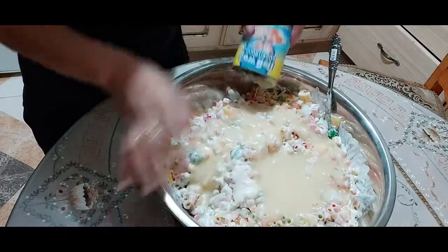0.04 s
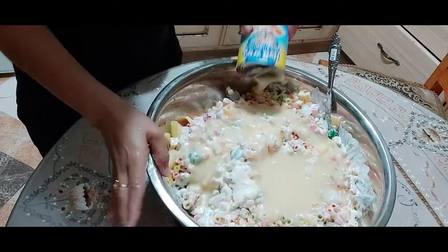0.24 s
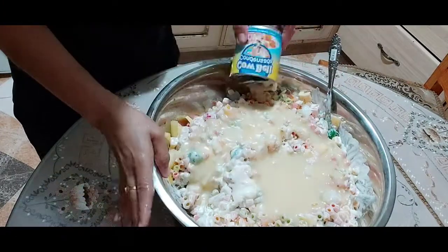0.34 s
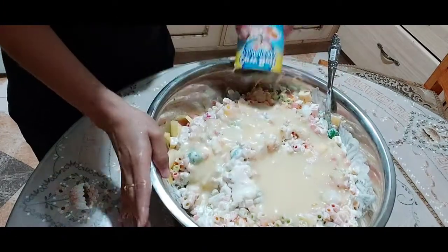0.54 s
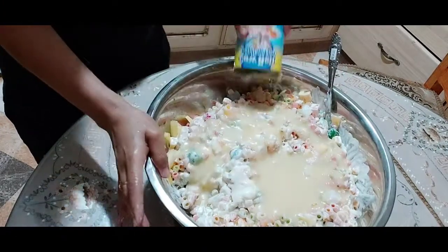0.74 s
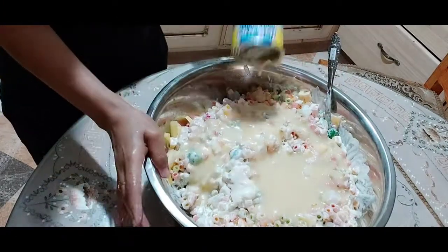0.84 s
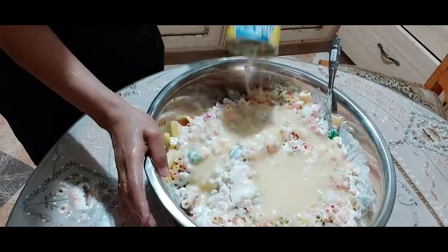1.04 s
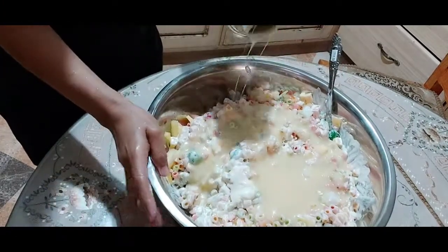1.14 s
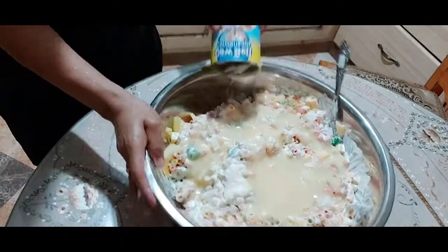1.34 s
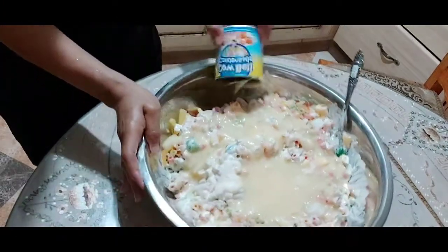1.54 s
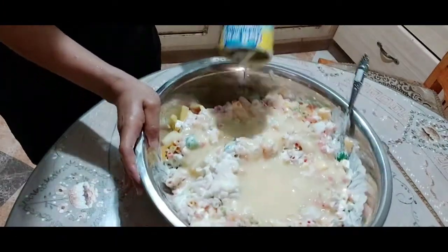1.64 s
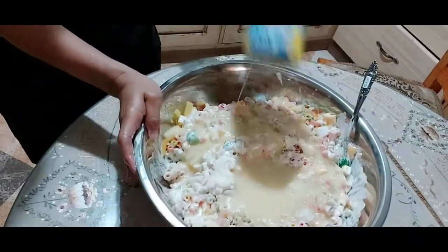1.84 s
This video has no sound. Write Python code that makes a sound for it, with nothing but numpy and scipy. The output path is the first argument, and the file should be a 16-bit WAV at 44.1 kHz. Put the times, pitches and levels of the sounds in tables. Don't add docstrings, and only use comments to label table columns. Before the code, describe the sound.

Sharp short can knocks on a food-filled steel bowl, soft at first and then firmer, a brief scrape and two loud blows; bright kitchen echoes, low household murk and faint hiss, close phone microphones.

```python
import sys
import numpy as np
from scipy import signal
from scipy.fft import rfft, irfft
from scipy.io import wavfile
from scipy.ndimage import map_coordinates

SR = 44100
rng = np.random.default_rng(int(sys.argv[2]) if len(sys.argv) > 2 else 0)


def gain_from_db(level_db):
    decades = np.asarray(level_db, float) / 20
    return 10 ** decades


def int16_out(signal):
    q = np.round(np.clip(np.atleast_2d(signal).T, -1, 1) * 32767)
    wavfile.write(sys.argv[1], SR, q.astype(np.int16))


N = 83790


def fade(t, t60):
    return np.exp(-np.log(1000) * t / t60)


def pan(db):
    return gain_from_db([[db / 2], [-db / 2]])


def colour(x, points):
    hz = np.fft.rfftfreq(x.shape[-1], 1 / SR) + 1
    point_hz, point_db = np.transpose(points)
    gain = gain_from_db(np.interp(np.log(hz), np.log(point_hz), point_db))
    y = irfft(rfft(x) * gain, x.shape[-1])
    return y / np.sqrt(np.mean(y ** 2))


def blend(mid, side, alike):
    alike = np.clip(alike, 0, 1)
    return np.sqrt((1 + alike) / 2) * mid + np.sqrt((1 - alike) / 2) * side * np.array([[1], [-1]])


def pair(size, alike):
    mid, side = rng.standard_normal((2, size))
    return blend(mid, side, alike)


# (frequency [Hz], level [dB per Hz])
HUM_COLOUR = [(35, -66), (75, -9), (105, -19.5), (135, -2.5), (205, -18.5), (360, -8), (800, -12),
              (16000, -50.5)]
# (time [s], level [dB])
HUM_LEVEL = [
    (0, -45),
    (.1, -49.5),
    (.6, -57),
    (1.6, -49.5),
    (1.9, -56.5),
]


def hum():
    low_pass = signal.butter(1, 900, fs=SR, output="sos")
    high_pass = signal.butter(1, 900, "high", fs=SR, output="sos")
    low = signal.sosfilt(low_pass, pair(N, .93))
    high = signal.sosfilt(high_pass, pair(N, 0.052))
    time, level_db = np.transpose(HUM_LEVEL)
    swell = gain_from_db(np.interp(np.arange(N) / SR, time, level_db))
    return colour(low + high, HUM_COLOUR) * swell * pan(2.5)


# (frequency [Hz], level [dB])
HISS_COLOUR = [(1500, 2), (3000, -5.5), (6000, -9), (8000, -4), (10500, -1), (14500, -5.5), (16500, -7.5)]


def hiss():
    return gain_from_db(-63) * colour(pair(N, 0), HISS_COLOUR)


# (time [s], level [dB])
TICK_TIMES = [
    (.06, -55),
    (1.718, -55),
    (1.787, -56),
]


def ticks():
    tick_hz, t60_s = 2500, .012
    points = [(tick_hz / 4, -10), (tick_hz, 0), (tick_hz * 2, -20)]
    out, t = np.zeros((2, N + SR)), np.arange(SR // 10) / SR
    for s, db in TICK_TIMES:
        i = int(s * SR)
        out[:, i:i + len(t)] += gain_from_db(db) * colour(pair(len(t), 1.0), points) * fade(t, t60_s)
    return out[:, :N]


# (frequency [Hz], t60 [s], level [dB], likeness of the two ports [0-1])
ROOM = [(48.7, 0.49, -9.5, 1), (139, 0.89, -16, 0.96), (378, 0.49, -9, 0.78), (756, 0.4, -18.5, 0.29),
        (1390, 0.43, -16, 0), (3240, 0.48, -7.5, 0.14), (6500, 0.36, -4, 0), (12340, .33, -5, 0.07)]


def echoes():
    gap_s, rise_s = 0.0013, 0.002
    t, room = np.arange(SR) / SR, np.array(ROOM)
    octaves = np.log2(np.fft.rfftfreq(SR, 1 / SR) + 1)
    noise, echo = rfft(pair(SR, 0)), 0
    for octave in np.arange(5, 14.6, .5):
        t60, db, alike = (np.interp(octave, np.log2(room[:, 0]), room[:, k]) for k in (1, 2, 3))
        window = np.cos(np.pi * np.clip(octaves - octave, -.5, .5))
        mid, side = irfft(noise * window, SR)
        even_energy = np.sqrt(2 * np.log(1000) / t60 / SR)
        echo = echo + blend(mid, side, alike) * fade(t, t60) * gain_from_db(db) * even_energy
    return echo * (1 - np.exp(-np.maximum(t - gap_s, 0) / rise_s)) * gain_from_db(10)


def kitchen(x, patterns):
    shared = .6
    turn = 2 * np.pi * rng.random()
    own = np.cos(turn) * patterns[1] + np.sin(turn) * patterns[2]
    echo = np.sqrt(shared) * patterns[0] + np.sqrt(1 - shared) * own
    return signal.fftconvolve(x[None, :SR // 3], echo, axes=1)[:, :SR]


def ring(t, modes):
    out = np.zeros((2, len(t)))
    for k, (hz, db, t60, pan_db) in enumerate(modes):
        hz_chance, db_chance = rng.standard_normal(2)
        hz = hz * (1 + .005 * hz_chance)
        gain = gain_from_db(db + 1.2 * db_chance) * pan(pan_db)
        out += (-1) ** k * gain * np.sin(2 * np.pi * hz * t) * fade(t, t60)
    return out


# (frequency [Hz], level [dB], t60 [s], left minus right [dB])
TABLE_MODES = [(53.3, -13, 0.3, -10), (84, 0.5, 0.034, -21), (146, -4, 0.11, -0.5), (163, -8, 0.18, 6.5),
               (211.7, 7, 0.074, 2.5), (248, 3, 0.11, 4), (317, 7, 0.013, -2), (426, -5, 0.089, 15)]


def table_thud(t):
    return ring(t, TABLE_MODES) * (1 - np.exp(-t / .004))


# (frequency [Hz], level [dB], t60 [s], left minus right [dB])
CAN_MODES = [(393, -9, 0.051, 2), (587.6, -13.5, 0.13, -2), (668, 10, 0.031, 1), (807.5, 2.5, 0.038, -2.5),
             (944, 1.5, 0.056, 1), (1076, -14, 0.12, -9.5), (1288, 4, 0.024, 0), (1652, -6, 0.018, 8),
             (1796, -23.5, 0.035, -34), (2116, -2.5, 0.0078, -19.5), (2364, -20.5, 0.012, 29),
             (715, -3.5, 0.058, 6)]
# (frequency [Hz], level [dB], t60 [s], left minus right [dB])
RIM_MODES = [(4450, -2, .014, -2), (4640, 0, .016, -2), (4850, -3, .014, -2)]


def can_and_bowl(t):
    return ring(t, CAN_MODES) + gain_from_db(-26) * ring(t, RIM_MODES)


# (frequency [Hz], level [dB], t60 [s], left minus right [dB])
TURNED_MODES = [(194.4, 10, 0.017, 2), (420, -47, 0.1, 3), (563, -13, 0.031, 2), (637, 7.5, 0.027, 1),
                (715, -5, 0.11, -5.5), (947, 7.5, 0.028, -2.5), (1164, -4, 0.058, -2.5),
                (1144, -3.5, 0.022, -8), (1393, -17, 0.09, 15), (1590, -36, 0.024, -8),
                (2136, -45, 0.0063, -10), (568, -15, 0.063, -8), (815, -5.5, 0.071, 0)]


def turned_can(t):
    return ring(t, TURNED_MODES) * (1 - np.exp(-t / .004))


def snap(t, width_s):
    u = t / width_s - 2
    return -(u + 0.36) * np.exp(.5 - u ** 2 / 2)


def crack(t, points, t60):
    noise = colour(pair(len(t), 0.23), points) * fade(t, t60)
    impulse = (t == 0) * 1.
    click = np.roll(colour(impulse, points), 128) / np.sqrt(len(t))
    return noise, click * gain_from_db(5.5)


# (frequency [Hz], level [dB])
GRAZE_COLOUR = [(400, -36), (700, 8), (1500, -15.5), (3300, -10.5), (5000, -2), (7500, -13), (9500, -2),
                (15000, -20)]


def graze(t, patterns):
    level_db, t60_s = -26.5, 0.035
    noise, click = crack(t, GRAZE_COLOUR, t60_s)
    return gain_from_db(level_db) * noise, kitchen(gain_from_db(level_db + 2.0) * click, patterns)


# (frequency [Hz], level [dB])
CRACK_COLOUR = [(1000, -16.5), (2300, -4.5), (3300, -9), (4650, -3), (6300, -12), (10000, -10),
                (14000, -11), (16500, -26)]


def blow(t, levels, body, snap_s, patterns):
    ring_db, snap_db, crack_db, thud_db = levels
    body = gain_from_db(ring_db) * body + gain_from_db(thud_db) * table_thud(t)
    push = gain_from_db(snap_db) * snap(t, snap_s)
    noise, click = crack(t, CRACK_COLOUR, 0.019)
    direct = body + push + gain_from_db(crack_db) * noise
    to_walls = body.mean(axis=0) + gain_from_db(-4) * push + gain_from_db(crack_db) * click
    return direct, kitchen(to_walls, patterns)


# (time [s], ring [dB], snap [dB], crack [dB], thud [dB])
QUICK_BLOWS = [
    (.199, -21, -22, -24.5, -33),
    (0.3798, -16.5, -15.5, -14.5, -26.5),
    (.544, -14, -12, -13, -25.5),
    (.7252, -13, -10.5, -13, -30.5),
    (.9476, -12, -10, -11, -26.5),
]
# (time [s], ring [dB], snap [dB], crack [dB], thud [dB])
HEAVY_BLOWS = [
    (1.2931, -9, 0, -8.5, -31.5),
    (1.5645, -10.5, -3.5, -11.5, -54),
]


def blows():
    out, t = np.zeros((2, 2, N + SR)), np.arange(SR) / SR
    patterns = [echoes(), echoes(), echoes()]

    def place(s, sound):
        i = int(s * SR)
        out[..., i:i + SR] += sound

    for s, *levels in QUICK_BLOWS:
        place(s, blow(t, levels, can_and_bowl(t), .0001, patterns))
    place(1.2297, graze(t, patterns))
    for s, *levels in HEAVY_BLOWS:
        place(s, blow(t, levels, turned_can(t), .00014, patterns))
    return out[..., :N]


def scene():
    near, far = blows()
    near = near + ticks()
    port_lag_s = .00007
    right = map_coordinates(near[1], [np.arange(N) - port_lag_s * SR], mode="nearest")
    faint = far + hum() + hiss()
    faint_top = signal.ellip(8, .2, 60, 15400, fs=SR, output="sos")
    return np.array([near[0], right]) + signal.sosfilt(faint_top, faint)


def roll_off(x):
    return signal.sosfilt(signal.butter(12, 16820, fs=SR, output="sos"), x)


def record(dry):
    port_hz, port_width_hz, limit = 4650, 500, 1.1
    peak = signal.lfilter(*signal.iirpeak(port_hz, port_hz / port_width_hz, fs=SR), dry)
    x = dry + (gain_from_db([[5], [6.5]]) - 1) * peak
    treble = signal.sosfilt(signal.butter(1, 11000, "high", fs=SR, output="sos"), x)
    x = x + (pan(-3) - 1) * treble
    x = signal.sosfilt(signal.butter(4, 39, "high", fs=SR, output="sos"), x)
    x = limit * np.tanh(x / limit)
    x = signal.sosfilt(signal.ellip(8, .2, 70, 16600, fs=SR, output="sos"), x)
    return roll_off(x)


dry = scene()
out = record(dry)
int16_out(out)
```